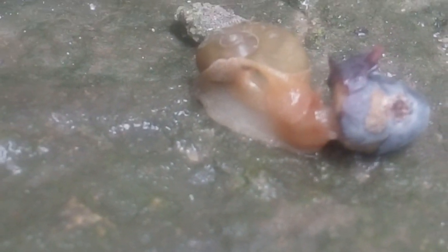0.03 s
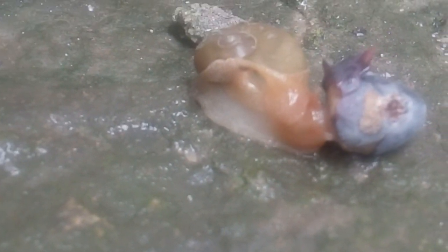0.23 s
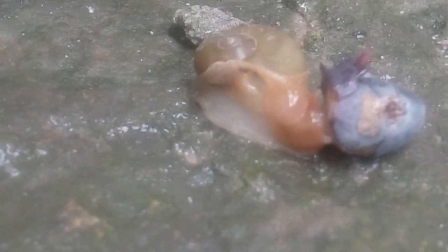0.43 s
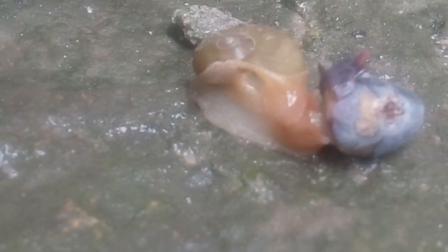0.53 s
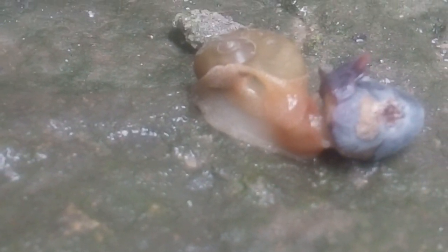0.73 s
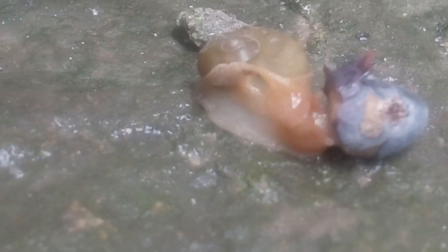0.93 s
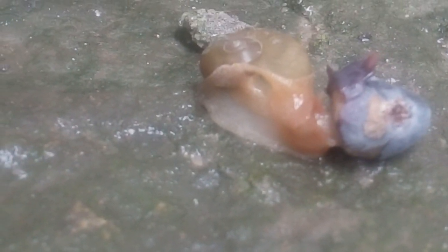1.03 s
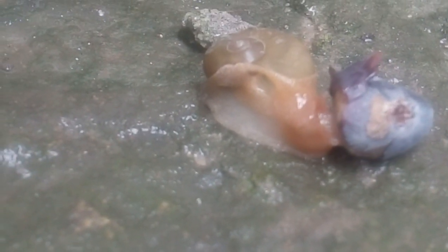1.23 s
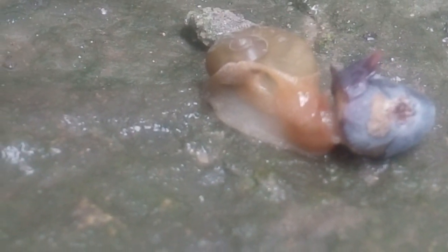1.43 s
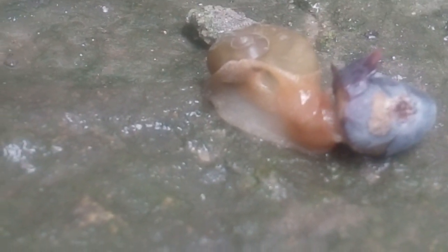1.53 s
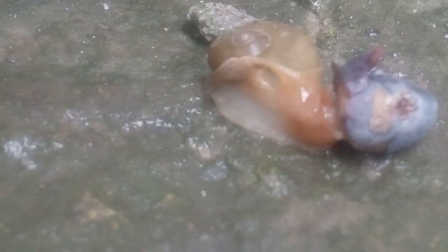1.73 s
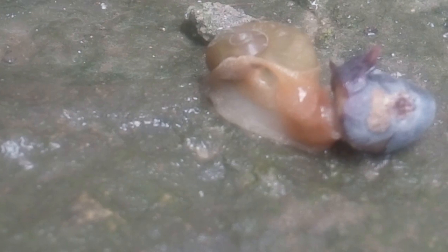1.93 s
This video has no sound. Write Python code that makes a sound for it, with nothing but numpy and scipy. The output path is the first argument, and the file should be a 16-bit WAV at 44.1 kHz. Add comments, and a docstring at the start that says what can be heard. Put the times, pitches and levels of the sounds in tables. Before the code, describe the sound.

Two dull handling knocks hit the microphone close on the left, at about 0.2 and 0.6 seconds, each with a hollow ring and a brief gritty scuff. Softer grip bumps come just before them, then mostly on the right around 0.9, 1.0 and 1.9 seconds. A tiny tick sounds near 1.1 seconds. Quiet outdoor rumble, light rustle, faint hum and hiss continue throughout the two seconds.

```python
"""Two dull knocks with a short gritty scuff, close on the left, in a quiet place outdoors.
A finger brushes the left microphone port of a hand-held camera: it pushes on the case, which
rings hollow, and tiny slips of skin rattle the port. Softer bumps of the grip come on either
side, over a low rumble, a rustle, microphone hiss, a faint hum and a few small ticks."""
import sys
import numpy as np
from scipy import signal
from scipy.fft import rfft, irfft
from scipy.io import wavfile

SR = 44100
rng = np.random.default_rng(int(sys.argv[2]) if len(sys.argv) > 2 else 0)


def generate_wav(signal):
    """Clip the signal to [-1, 1] and save it as 16-bit WAV at the path in sys.argv[1]."""
    frames = np.transpose(np.atleast_2d(signal))
    scaled = np.clip(frames, -1, 1) * 32767
    pcm = np.round(scaled).astype(np.int16)
    wavfile.write(sys.argv[1], SR, pcm)


N = 2 * SR

# Each row: time in seconds, peak before the low cut in dB, contact in seconds,
# 1 for press or -1 for lift, drive into the case ring in dB.
FINGER_PUSHES = [(0.2311, -9, 0.00055, 1, -3.5), (0.2327, -14, 0.00094, -1, 13),
                 (.2371, -13.5, 0.002, -1, 15.5), (0.2391, -15, 0.00089, 1, -8),
                 (0.2467, -19, 0.00041, -1, 11), (0.2494, -18.5, 0.00046, 1, -0.5),
                 (.2510, -14.5, 0.0019, -1, -2), (0.6231, -14.5, 0.0014, 1, -2),
                 (0.6253, -18.5, 0.0015, -1, -8), (0.6339, -7, 0.00046, 1, -7.5),
                 (0.6356, -10.5, 0.0023, -1, -8), (.64375, -21, 0.0014, -1, 20),
                 (0.6459, -8, .0017, -1, -5.5)]
# Each row: frequency in Hz, width in Hz, gain in dB.
CASE_MODES = [(92.6, 28, -6), (254, 20, -22.5), (491, 115, 0), (910, 140, 0.5)]


def knocks():
    """A finger presses on the case and lets go; each push rings the hollow case."""
    pushes = np.array([way * thud(s, db, contact_s) for s, db, contact_s, way, _ in FINGER_PUSHES])
    drive = from_db(np.array(FINGER_PUSHES)[:, -1]) @ pushes
    ring = sum(from_db(db) * resonance(drive, hz, width_hz) for hz, width_hz, db in CASE_MODES)
    return pushes.sum(axis=0) + ring


# Each row: start in seconds, length in seconds, relative start and end levels in dB, treble in dB.
FINGER_SLIDES = [(0.2257, .0025, -48, -44, -1), (0.2291, 0.0041, -30, -16.5, 1),
                 (0.233, 0.0036, -17.5, -16.5, 0), (0.2378, 0.0067, -19, -21.5, -4.5),
                 (0.2455, .0052, -19.5, -26, -2), (.6205, 0.0068, -42.5, -34.5, -5),
                 (.6322, 0.012, -25.5, -24.5, 0), (0.642, 0.005, -18.5, -26.5, 1)]
# Each row: frequency in Hz, gain in dB.
SCUFF_EQ = [(30, -9), (100, -18.5), (250, -4), (560, 4.5), (730, -10), (950, 4), (1400, -3), (2200, -4),
            (3000, -6.5), (4500, -8.5), (5600, -12.5), (6500, -17.5), (7800, -30.5), (15000, -35.5)]
# Each row: frequency in Hz, width in Hz, gain in dB.
PORT_MODES = [(1110, 98, -27), (1870, 230, -12), (2840, 310, -4.5)]


def scuffs(slips_per_s=9000, spread_db=4, attack_s=0.00019, release_s=0.00098):
    """Dense tiny slips of skin rattle the port for some milliseconds."""
    coder_tail_db, coder_tail_decay_s = -30.5, 0.0085  # faint hiss of the camera's audio coding
    t, force = np.arange(N) / SR, np.zeros(N)
    impulses = (rng.random(N) < slips_per_s / SR) * rng.choice([-1, 1], N)
    slips = unit_rms(impulses * from_db(spread_db * rng.standard_normal(N)))
    treble = signal.sosfilt(signal.butter(1, 1500, "high", fs=SR, output="sos"), slips)
    for start_s, length_s, start_db, end_db, treble_db in FINGER_SLIDES:
        attack = np.clip((t - start_s) / attack_s, 0, 1)
        after_s = np.maximum(t - start_s - length_s, 0)
        coder_tail = from_db(coder_tail_db) * np.exp(-after_s / coder_tail_decay_s)
        envelope = attack * (np.exp(-after_s / release_s) + coder_tail)
        gain = from_db(np.interp(t, [start_s, start_s + length_s], [start_db, end_db]))
        force += envelope * gain * (slips + (from_db(treble_db) - 1) * treble)
    grit = from_db(9) * coloured(force, SCUFF_EQ)
    return grit + sum(from_db(db) * resonance(grit, hz, width_hz) for hz, width_hz, db in PORT_MODES)


# Each row: time in seconds, peak before the low cut in dB, contact in seconds, left minus right in dB.
GRIP_BUMPS = [(0.058, -31.5, 0.0017, 28), (0.077, -29.5, 0.0056, 38), (0.106, -37, 0.0012, -20),
              (.123, -34, 0.0044, -13), (0.141, -28.5, 0.0028, 27), (0.1407, -31.5, 0.00088, 32),
              (0.36, -31, 0.0039, -17), (0.786, -34, 0.003, -14), (0.827, -34.5, 0.0043, -24),
              (0.903, -21.5, 0.0037, -29), (0.973, -35.5, 0.0021, 15), (.996, -28.5, 0.0035, -16),
              (1.002, -23.5, 0.0054, -22), (1.487, -33, 0.007, -7), (1.667, -35, 0.005, -10),
              (1.928, -27.5, 0.0081, -4)]


def grip():
    """The hand bumps the case softly; the farther port gets less of each bump."""
    out = 0
    for s, db, contact_s, pan_db in GRIP_BUMPS:
        out -= thud(s, db, contact_s) * stereo(min(pan_db, 0), min(-pan_db, 0))
    return out


# Each row: frequency in Hz, left and right noise density in dB/Hz.
NOISE_FLOOR = [(20, -99, -87.5), (33.5, -80.5, -75.5), (57.6, -73.5, -77.5), (93, -74.5, -69.5),
               (141, -72.5, -78.5), (215, -74, -78), (330, -83, -83), (697, -97, -96), (1040, -98, -102),
               (2040, -107, -108), (4090, -112, -110), (5730, -113, -109), (8100, -126, -126),
               (15000, -129, -129)]


def rumble_and_hiss():
    """Steady low rumble and microphone hiss, independent on each side."""
    spectrum = np.array(NOISE_FLOOR)
    white = rng.standard_normal((2, N)) * np.sqrt(SR / 2)  # 0 dB/Hz
    return np.array([coloured(white[side], spectrum[:, [0, side + 1]]) for side in (0, 1)])


# Each row: time in seconds, rms level before flutter in dB.
RUSTLE_LEVELS = [(0, -59), (.14, -59.5), (0.298, -64), (.5, -67), (0.699, -61.5), (1.0, -62), (1.25, -70.5),
                 (1.45, -63.5), (1.68, -64.5), (1.85, -70), (2, -61)]
# Each row: frequency in Hz, relative gain in dB.
RUSTLE_EQ = [(20, -25), (60, -9), (300, 3.5), (800, -6.5), (1600, -13.5), (3000, -31), (8000, -48)]


def rustle(flutter_db=2, flutter_hz=18):
    """Midrange noise that swells slowly and flutters independently on each side."""
    level_db = np.interp(np.arange(N) / SR, *np.transpose(RUSTLE_LEVELS))
    sides = []
    for _ in range(2):
        noise = unit_rms(coloured(rng.standard_normal(N), RUSTLE_EQ))
        sides.append(noise * from_db(level_db + flutter_db * drift(flutter_hz)))
    return np.array(sides)


# Each row: frequency in Hz, left and right rms level in dB.
HUM_TONES = [(131.2, -59, -70), (197.3, -59, -67.5), (273, -70.5, -78), (552, -68, -83.5)]


def hum(wander_hz=2.43, waver_db=4):
    """Faint low tones that waver in pitch and level."""
    out = 0
    for hz, left_db, right_db in HUM_TONES:
        phase = 2 * np.pi * np.cumsum(hz + wander_hz * drift(rate_hz=3.87)) / SR
        tone = np.sin(phase) * from_db(waver_db * drift(rate_hz=8.5))
        out += unit_rms(tone) * stereo(left_db, right_db)
    return out


# Each row: time in seconds, left rms level at the crest in dB, band centre in Hz.
FAINT_TICKS = [(.079, -64, 1500), (.141, -63, 1400), (1.148, -59.5, 2750)]


def ticks(sigma_s=0.004, width_hz=800):
    """Small ticks on the left, each a brief swell of band noise."""
    out = 0
    for s, db, hz in FAINT_TICKS:
        envelope = np.exp(-0.5 * ((np.arange(N) / SR - s) / sigma_s) ** 2)
        band = resonance(resonance(rng.standard_normal(N), hz, width_hz), hz, width_hz)
        out += envelope * unit_rms(band) * from_db(db)
    return out * stereo(left_db=0, right_db=-18)


def thud(s, db, contact_s, low_cut_hz=61, steepness=8.6):
    """One smooth push through the camera's zero-phase low cut: a thud that swings before and after."""
    push = np.exp(-np.pi * ((np.arange(N) / SR - s) / contact_s) ** 2)
    slope = (np.arange(N // 2 + 1) * SR / N / low_cut_hz) ** steepness
    return from_db(db) * irfft(rfft(push) * slope / (1 + slope), N)


def resonance(x, hz, width_hz):
    """Two-pole resonance, peak gain 1."""
    r = np.exp(-np.pi * width_hz / SR)
    feedforward = np.array([1, 0, -1]) * (1 - r * r) / 2
    feedback = [1, -2 * r * np.cos(2 * np.pi * hz / SR), r * r]
    return signal.lfilter(feedforward, feedback, x + 1e-18)


def coloured(x, points):
    """Minimum-phase filter through (Hz, dB) points."""
    hz, db = np.transpose(points)
    bin_hz = np.arange(N // 2 + 1) * SR / N
    gain = from_db(np.interp(np.log(bin_hz + 1), np.log(hz), db))
    cepstrum = irfft(np.log(gain), N)
    cepstrum[1:N // 2] *= 2  # fold onto positive time: causal
    cepstrum[N // 2 + 1:] = 0
    return irfft(rfft(x) * np.exp(rfft(cepstrum)), N)


def drift(rate_hz):
    """Slow random curve, rms 1."""
    hop, settle_steps = 40, 2000
    r = np.exp(-2 * np.pi * rate_hz * hop / SR)
    noise = rng.standard_normal(N // hop + settle_steps + 2)
    slow = signal.lfilter([1], [1, -2 * r, r * r], noise)[settle_steps:]
    return np.interp(np.arange(N) / hop, np.arange(len(slow)), unit_rms(slow))


def from_db(db):
    return 10 ** (np.asarray(db) / 20)


def stereo(left_db, right_db):
    return from_db([[left_db], [right_db]])


def unit_rms(x):
    return x / np.sqrt(np.mean(x ** 2) + 1e-20)


def scene():
    """The finger at the left port and the grip, over the quiet background."""
    finger = (knocks() + scuffs()) * stereo(left_db=0, right_db=-49)
    return finger + grip() + rumble_and_hiss() + rustle() + hum() + ticks()


def record(dry, cutoff_hz=15600):
    """The camera cuts the top treble steeply."""
    return signal.sosfilt(signal.ellip(10, 0.1, 80, cutoff_hz, fs=SR, output="sos"), dry)


dry = scene()
out = record(dry)
generate_wav(out)
```